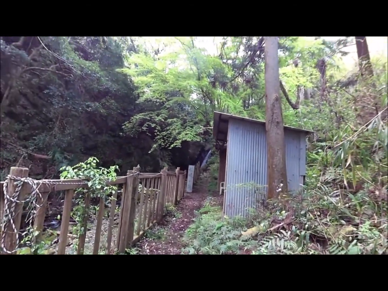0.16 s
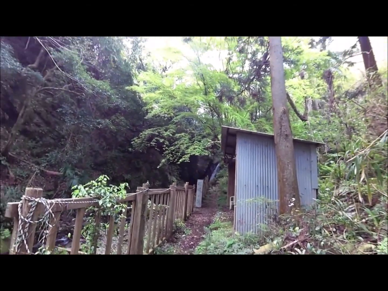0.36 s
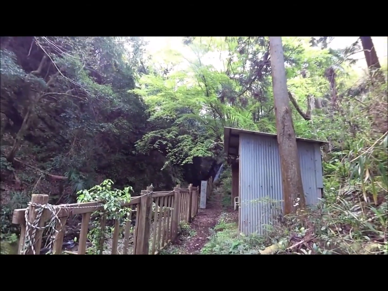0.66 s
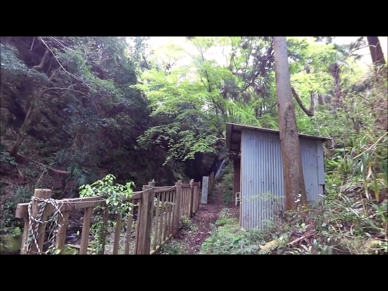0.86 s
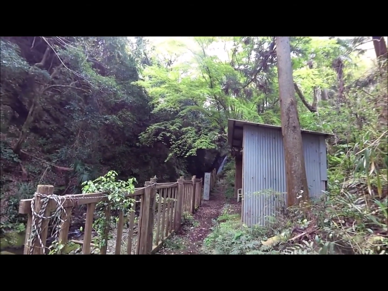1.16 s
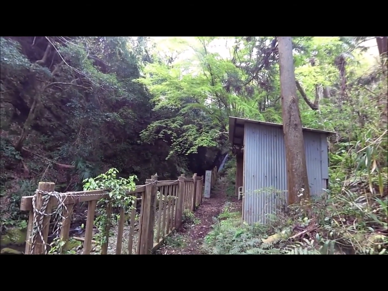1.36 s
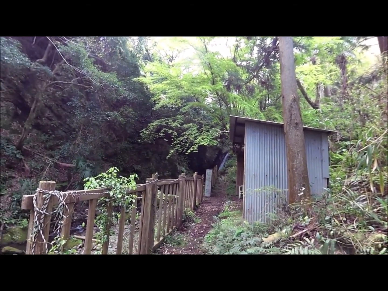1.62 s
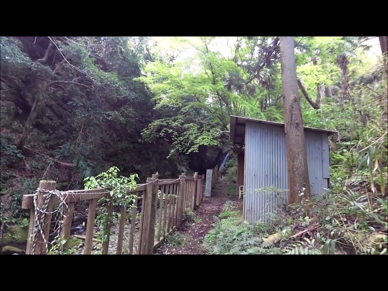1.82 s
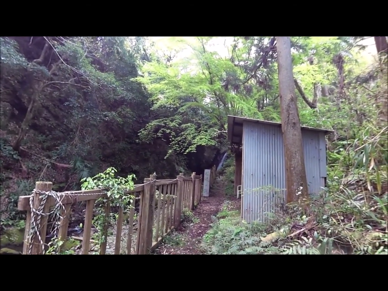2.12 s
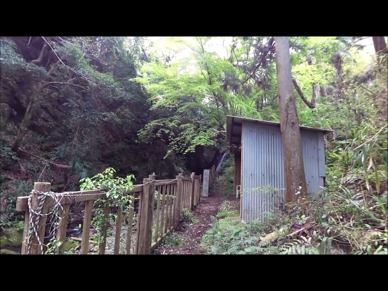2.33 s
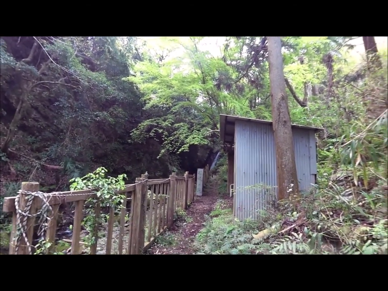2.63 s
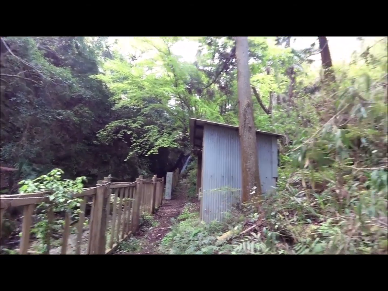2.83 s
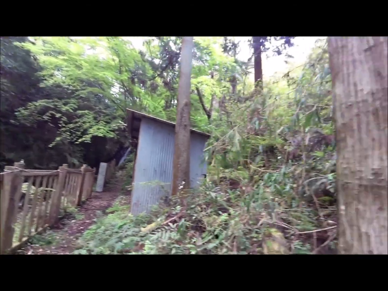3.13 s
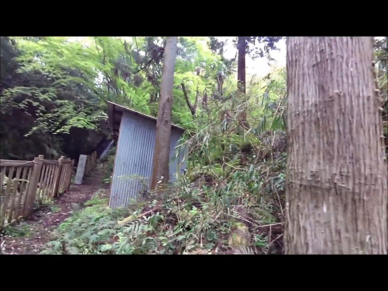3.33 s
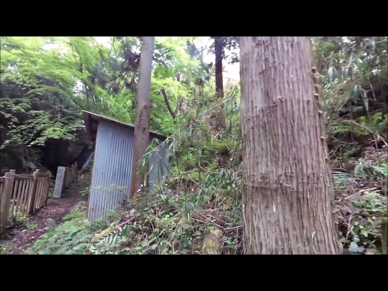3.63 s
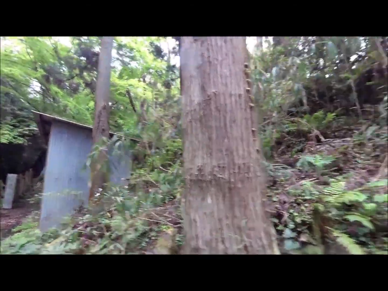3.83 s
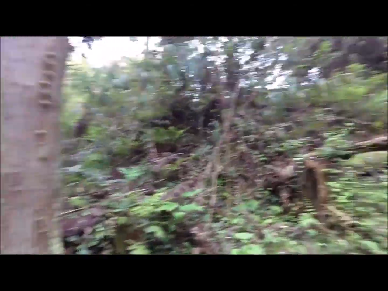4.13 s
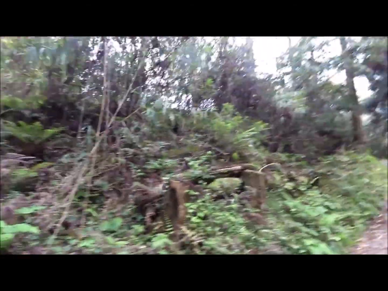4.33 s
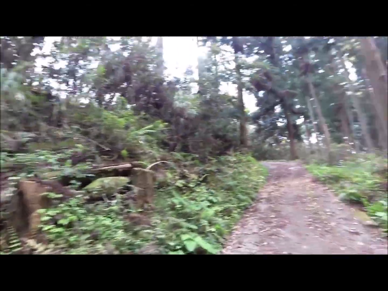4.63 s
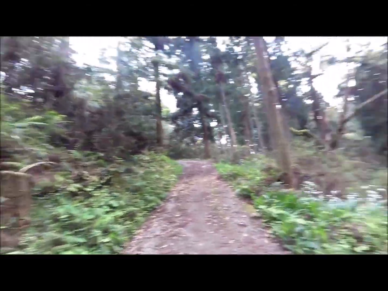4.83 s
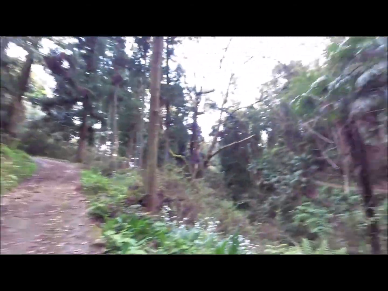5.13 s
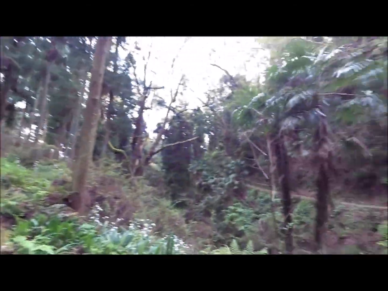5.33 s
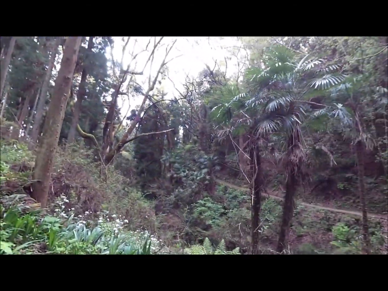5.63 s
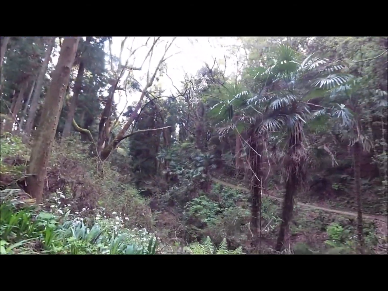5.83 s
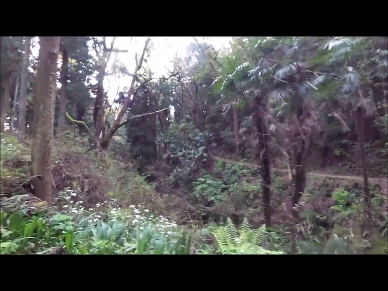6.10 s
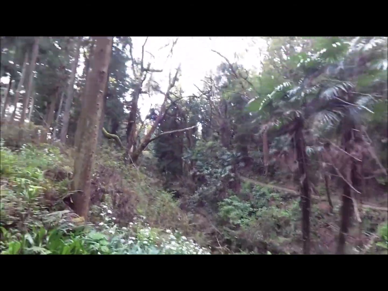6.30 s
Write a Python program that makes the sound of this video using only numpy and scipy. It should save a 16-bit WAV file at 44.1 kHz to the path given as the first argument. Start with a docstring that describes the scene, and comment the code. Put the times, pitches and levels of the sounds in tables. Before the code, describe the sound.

A small waterfall and stream rush steadily in a forest, with two sharp plastic clicks and a few soft bumps of camera handling.

```python
"""A path in a wooded gully, where a small waterfall and its stream rush, heard through a hand-held camera.
Churning water and ringing bubbles make the rush. The camera turns from the fall to look downstream,
and the water dulls as it passes the bank. The grip shifts: the plastic case sticks and slips in two
sharp clicks, fingers bump and rub it, and a few faint ticks come from dry leaves breaking underfoot."""
import sys
import numpy as np
from scipy import signal
from scipy.fft import rfft, irfft, next_fast_len
from scipy.io import wavfile
from scipy.ndimage import uniform_filter1d

SR = 44100
rng = np.random.default_rng(int(sys.argv[2]) if len(sys.argv) > 2 else 0)


def to_wav(s):
    """Save 16-bit WAV."""
    ch = np.atleast_2d(s).T  # columns
    pcm = np.round(np.clip(ch, -1, 1) * 32767)  # PCM
    wavfile.write(sys.argv[1], SR, pcm.astype(np.int16))


N = 284886


def amp(db):
    """Decibels to gain."""
    return 10 ** (np.asarray(db) / 20)


def unit(x):
    """x at rms 1."""
    return x / np.sqrt(np.mean(x ** 2) + 1e-20)


def filtered(x, response):
    """x through an EQ given as gain against frequency."""
    size = next_fast_len(N + SR // 2)
    return irfft(rfft(x, size) * response(np.fft.rfftfreq(size, 1 / SR)), size)[:N]


def coloured(x, tone):
    """x through an EQ curve of (freq_hz, level_db) points, brought to rms 1."""
    freq_hz, level_db = np.transpose(tone)
    curve = lambda hz: amp(np.interp(np.log(hz + 1), np.log(freq_hz), level_db, left=-120, right=-120))
    return unit(filtered(x, curve))


def band_limited(x, low_hz, high_hz):
    """x through a steep low cut and high cut."""
    low_cut = signal.butter(4, low_hz, "high", fs=SR, output="sos")
    high_cut = signal.butter(4, min(high_hz, .45 * SR), fs=SR, output="sos")
    return signal.sosfilt(np.vstack([low_cut, high_cut]), x)


def add(track, start_s, sound):
    """Mix a sound into the track."""
    room = track[round(start_s * SR):][:len(sound)]
    room += sound[:len(room)]


def swell(centre_s, half_width_s):
    """A bell-shaped fade in and out."""
    return np.exp(-((np.arange(N) / SR - centre_s) / half_width_s) ** 2)


def crackle(per_s):
    """Tiny impulses at random times and strengths."""
    return rng.standard_normal(N) * (rng.random(N) < per_s / SR)


def thud(centre_s, hz, width_cycles=0.4):
    """A soft contact: the body swings out and back once, with no sharp edge."""
    near = np.arange(round((centre_s - 2 / hz) * SR), round((centre_s + 2 / hz) * SR))
    cycles = (near / SR - centre_s) * hz
    out = np.zeros(N)
    out[near] = np.sin(2 * np.pi * cycles) * np.exp(-(cycles / width_cycles) ** 2)
    return out


# The crisp tone of a dry leaf cracking: freq_hz, level_db
LEAF_TONE = [(1500, -22), (3500, -2), (5500, 0), (7300, 8), (10000, -6), (12000, -19), (13500, -50)]
def leaf_rustle():
    """Many tiny cracks swell and fade as a foot turns on the leaves."""
    return amp(-72.5) * swell(centre_s=4.6, half_width_s=.15) * coloured(crackle(per_s=900), LEAF_TONE)


# Single leaves breaking in the litter: start_s, level_db, crumble_t60_s
LEAF_BREAKS = [(3.9091, -44, .016), (3.9561, -45, .04), (4.2115, -45, 0.016), (4.5635, -52, .014),
               (4.5756, -36, 0.0071), (4.6467, -42, .014), (4.7455, -49, .01), (4.7765, -47, .014),
               (5.3228, -47, .018), (5.9405, -47, 0.055)]
def leaf_ticks(crumble_db=-15, attack_s=.0006):
    """A dry leaf breaks with one crisp crack, then crumbles briefly."""
    breaks, t = np.zeros(N), np.arange(SR // 10) / SR
    for start_s, level_db, t60_s in LEAF_BREAKS:
        envelope = np.exp(-np.log(1000) * t / t60_s) * (1 - np.exp(-t / attack_s))
        crumble = amp(crumble_db) * envelope * rng.standard_normal(len(t))
        add(breaks, start_s, amp(level_db) * ((t == 0) + crumble))
    crack = coloured(np.arange(N) == SR // 200, LEAF_TONE)[:SR // 100]  # centred in 10 ms
    return signal.fftconvolve(breaks, crack / crack.max(), mode="same")


# The low tone of a hand on the case: freq_hz, level_db
GRIP_TONE = [(18, -13), (35, -3), (55, 4), (100, -7), (170, -12), (400, -36), (1000, -71)]
# The hand shifts its hold as a turn begins: centre_s, level_db, half_width_s
GRIP_SHIFTS = [(3.14, -52, .05), (4.15, -51.5, 0.19)]
def grip_rumble(resting_db=-69):
    """The hand rumbles faintly on the case, and swells when it shifts its hold."""
    shifts = sum(amp(db) * swell(centre_s, half_width_s) for centre_s, db, half_width_s in GRIP_SHIFTS)
    return (amp(resting_db) + shifts) * coloured(churn(patchy_db=1.0), GRIP_TONE)


# Gritty finger rubs: centre_s, level_db, half_width_s, pitch_hz
FINGER_RUBS = [(4.38, -46.5, 0.034, 3480), (4.548, -53, 0.013, 3400), (4.668, -38, 0.018, 1500),
               (5.96, -39, 0.022, 1400)]
def finger_scuffs():
    """Skin drags over the case in a short crowd of tiny slips, a broad band around their pitch."""
    out = np.zeros(N)
    for centre_s, level_db, half_width_s, pitch_hz in FINGER_RUBS:
        grit = unit(band_limited(crackle(per_s=3000), pitch_hz / 2, pitch_hz * np.sqrt(2)))
        out += amp(level_db) * swell(centre_s, half_width_s) * grit
    return out


# Soft finger landings on the camera body: centre_s, level_db, pitch_hz
FINGER_LANDINGS = [(0.1822, -15, 380), (3.2900, -41, 70), (4.125, -30, 100), (4.6687, -19, 520),
                   (4.6761, -22, 300), (4.925, -36, 130), (5.2964, -19.5, 490), (5.9589, -19.5, 422)]
def finger_bumps(settle_s=0.00598, settle_db=-13.5, settle_ratio=0.46):
    """A finger lands on the body, then settles with a softer, lower thud."""
    out = np.zeros(N)
    for centre_s, level_db, pitch_hz in FINGER_LANDINGS:
        settle = amp(settle_db) * thud(centre_s + settle_s, pitch_hz * settle_ratio)
        out += amp(level_db) * (thud(centre_s, pitch_hz) + settle)
    return out


# The short ring of the plastic case: pitch_hz, level_db, t60_s
CASE_MODES = [(1290, -13.5, 0.018), (2040, -8, 0.0077), (2710, -5.5, 0.0058), (3130, -7, 0.0098),
              (4300, 0.5, 0.0039), (5580, -6.5, .0075), (6700, -6, 0.0043)]
# Snaps of the case: start_s, gain_db, low_cut_hz, high_cut_hz, slip_count, pitch_ratio
CASE_SNAPS = [(4.1677, -2.5, 970, 16000, 1, 1.0), (4.2685, -28, 2800, 7000, 1, 0.99),
              (4.3576, -16, 2600, 8200, 1, 1.01), (4.367, -25, 1600, 3700, 1, 1.0),
              (4.383, -26, 2900, 7500, 1, 1.05), (4.3954, -7, 1900, 15000, 5, 1.104),
              (4.3960, 4, 1570, 1760, 1, 1.326), (4.4006, -7.5, 2400, 10000, 1, 1.07),
              (4.4040, -6, 2750, 9500, 1, .98), (4.555, -27.5, 2400, 4000, 1, 1.05),
              (5.9516, -19, 900, 2200, 1, 0.75)]
def case_clicks(slips_per_s=3430, muffle_hz=4560, crack_db=-41.5, jolt_hz=360, sway_hz=89):
    """The plastic sticks and slips; each slip cracks and rings the case at a pitch set by the hold."""
    out, t = np.zeros(N), np.arange(SR // 25) / SR
    mode_hz, mode_db, t60_s = np.transpose(CASE_MODES)[:, :, None]
    decay = np.exp(-np.log(1000) * t / t60_s)
    for start_s, gain_db, low_cut_hz, high_cut_hz, slip_count, pitch_ratio in CASE_SNAPS:
        strength = amp(mode_db + rng.normal(0, 0.3, mode_hz.shape))
        modes = strength * np.sin(2 * np.pi * mode_hz * pitch_ratio * t) * decay
        # the hand muffles the ring; the bare crack stays bright
        muffle = signal.butter(8, muffle_hz * pitch_ratio, fs=SR, output="sos")
        ring = signal.sosfilt(muffle, modes.sum(axis=0))
        slip = band_limited(ring + amp(crack_db) * (t == 0), low_cut_hz, high_cut_hz)
        for k in range(slip_count):
            add(out, start_s + k / slips_per_s, amp(gain_db) * slip)
        if low_cut_hz < high_cut_hz / 2:  # broad snaps also jolt the body and sway it in the hand
            out += amp(gain_db - 21.5) * thud(start_s + 0.5 / jolt_hz, jolt_hz)
            out += amp(gain_db - 28.5) * thud(start_s + 0.5 / sway_hz, sway_hz)
    return out


# The pan from the fall, past the bank, to downstream: time_s, heading_deg
CAMERA_PAN = [(0, 19), (.7, 3), (2.7, -11), (3.3, 42), (3.8, 37), (4.3, 92), (4.9, 138), (5.35, 178),
              (6.46, 194)]
def heading():
    """Where the camera points at each sample, in degrees."""
    time_s, heading_deg = np.transpose(CAMERA_PAN)
    return np.interp(np.arange(N) / SR, time_s, heading_deg)


def facing(bearing_deg, width_deg):
    """1 while the camera points along the bearing, falling to 0 on either side."""
    return np.exp(-((heading() - bearing_deg) / width_deg) ** 2)


def pickup(level_db, aim_deg, behind_cut_db, bank_cut_db):
    """Gain of a steady source, shifting as the camera turns off aim_deg or faces the overgrown bank."""
    away = (1 - np.cos(np.radians(heading() - aim_deg))) / 2
    at_bank = facing(bearing_deg=138, width_deg=38)
    return amp(level_db - behind_cut_db * away - bank_cut_db * at_bank)


def churn(patchy_db):
    """Turbulent noise whose level varies in patches of time and pitch."""
    spectrum = signal.stft(rng.standard_normal(N), nperseg=512)[2]
    patches = uniform_filter1d(rng.standard_normal(spectrum.shape), size=5, axis=0)  # across pitch
    patches = uniform_filter1d(patches, size=12, axis=1)  # across time
    return unit(signal.istft(spectrum * amp(patchy_db * unit(patches)), nperseg=512)[1][:N])


def bubbles(count, low_hz, high_hz, ring_cycles, spread_db, rise):
    """Air pockets ring briefly, rising in pitch as they near the surface."""
    when, smallness, strength = rng.random((count, 3)).T
    pitch_hz = low_hz * (high_hz / low_hz) ** smallness
    samples = np.arange(SR // 50)
    cycles = pitch_hz[:, None] * samples / SR
    age = np.minimum(cycles / ring_cycles, 2)
    envelope = np.exp(-np.log(100) * age) * (1 - np.exp(-2 * cycles))
    ring = np.sin(2 * np.pi * cycles * (1 + rise * age / 2)) * envelope
    # most are weak, a few stand out; small ones ring for less time, so they start louder
    gain = amp(-spread_db * np.log(np.maximum(1 - strength, .01))) * pitch_hz / low_hz
    positions = (when * N).astype(int)[:, None] + samples
    return unit(np.bincount(positions.ravel(), (gain[:, None] * ring).ravel(), N)[:N])


# Tones of the water that depend most on the aim: freq_hz, level_db
SHEEN_TONE = [(3700, -27), (4100, 0), (4400, -4), (4750, -7), (5400, -23)]  # thin, bright sheen of the fall
BOOM_TONE = [(75, -21), (100, -6), (120, 6), (135, -4.5), (165, -26)]  # boom of the plunge pool
TRICKLE_TONE = [(250, -11), (380, 11), (530, 11), (800, 1), (2300, -10), (2950, 1.5), (3600, -4.5),
                (4200, -8), (4900, -16), (5800, -32)]  # the stream running away below
def water_ahead():
    """Whichever water lies in front of the microphone adds its own colour."""
    sheen = coloured(churn(patchy_db=1.2), SHEEN_TONE)
    boom = coloured(churn(patchy_db=0), BOOM_TONE)
    trickle = coloured(rng.standard_normal(N), TRICKLE_TONE)
    just_past_fall = facing(bearing_deg=33, width_deg=18)
    return (sheen * amp(-68 + 7.5 * just_past_fall)
            + boom * pickup(level_db=-57.5, aim_deg=-22, behind_cut_db=16, bank_cut_db=-1)
            + trickle * pickup(level_db=-46, aim_deg=170, behind_cut_db=16.5, bank_cut_db=4))


# The four layers of the rush, from low body to airy top: freq_hz, level_db
PLUNGE_TONE = [(20, -38), (40, -15), (60, -10.5), (90, -6.5), (125, -1.5), (160, -3), (220, -1), (320, -3),
               (430, -1.5), (600, -4.5), (1200, -55)]
BABBLE_TONE = [(250, -26), (430, -13), (550, -1.5), (730, 0.5), (950, -0.5), (1250, -1.5), (1600, -9.5),
               (2600, -49)]
SPLASH_TONE = [(800, -26), (1250, -3.5), (1550, -1), (2000, -1), (2550, -3), (2900, -8), (3300, -14.5),
               (3800, -21), (5500, -56)]
SPRAY_TONE = [(2500, -25), (3500, 0), (3900, -5.5), (4400, -1), (5400, -5.5), (7000, -11.5), (8500, -18),
              (10300, -28), (12000, -35), (13000, -44), (15500, -49)]
def waterfall():
    """The fall drums in its pool, the stream babbles over stones, drops splash and spray hisses."""
    gurgle = bubbles(count=3000, low_hz=400, high_hz=1588, ring_cycles=14.6, spread_db=1.5, rise=0.082)
    drops = bubbles(count=5000, low_hz=1193, high_hz=3820, ring_cycles=16.6, spread_db=2.5, rise=0.16)
    plunge = coloured(churn(patchy_db=1.35), PLUNGE_TONE)
    babble = coloured(churn(patchy_db=0.24) + amp(-17) * gurgle, BABBLE_TONE)
    splash = coloured(churn(patchy_db=0.16) + amp(-15.5) * drops, SPLASH_TONE)
    spray = coloured(rng.standard_normal(N), SPRAY_TONE)
    return (plunge * pickup(level_db=-46, aim_deg=0, behind_cut_db=-0.4, bank_cut_db=1.3)
            + babble * pickup(level_db=-37, aim_deg=-58.5, behind_cut_db=5, bank_cut_db=1.4)
            + splash * pickup(level_db=-40, aim_deg=0, behind_cut_db=0.8, bank_cut_db=4)
            + spray * pickup(level_db=-58.5, aim_deg=73, behind_cut_db=4.5, bank_cut_db=5.5))


def scene():
    """Water all around, leaves underfoot and handling noise right at the microphone, in mono."""
    handling = case_clicks() + finger_bumps() + finger_scuffs() + grip_rumble()
    return (waterfall() + water_ahead() + leaf_ticks() + leaf_rustle() + handling)[None]


def record(dry, bass_hz=30, treble_hz=11900, band_limit_hz=15800):
    """The camera rounds off the highest peaks and loses the deep bass and top treble."""
    rounded = dry[0] / (1 + np.abs(dry[0] / .95) ** 5) ** (1 / 5)
    low_cut = lambda hz: hz ** 2 / (hz ** 2 + bass_hz ** 2)
    high_cut = lambda hz: 1 / np.sqrt(1 + (hz / treble_hz) ** 14)
    return filtered(rounded, lambda hz: low_cut(hz) * high_cut(hz) * (hz < band_limit_hz))[None]


dry = scene()
out = record(dry)
to_wav(out)
```